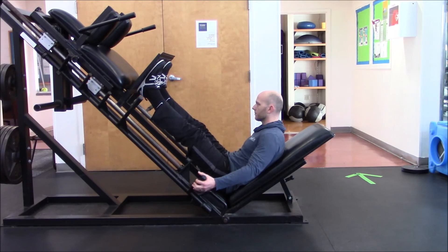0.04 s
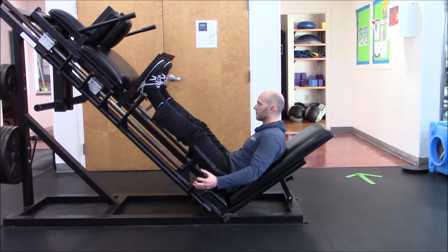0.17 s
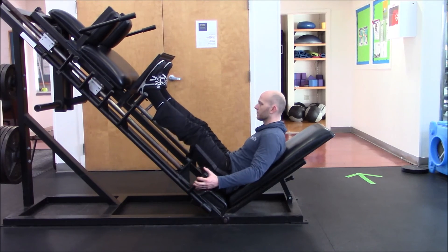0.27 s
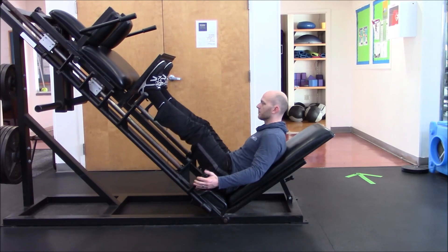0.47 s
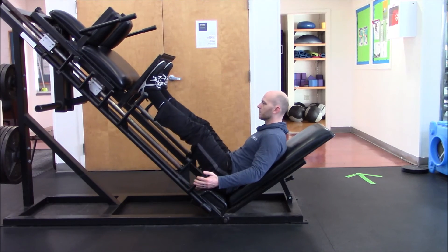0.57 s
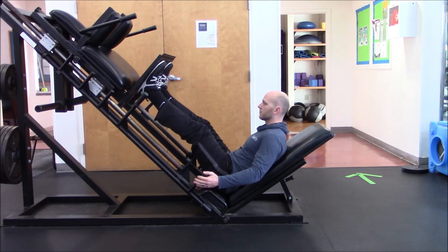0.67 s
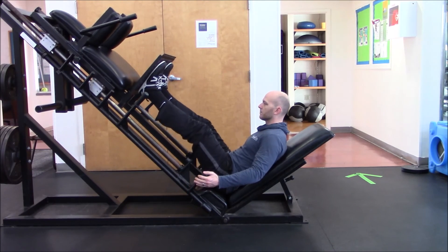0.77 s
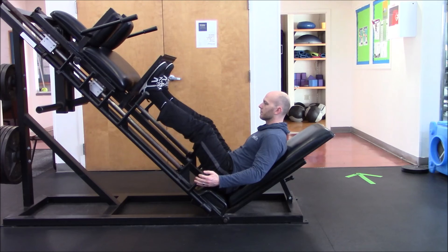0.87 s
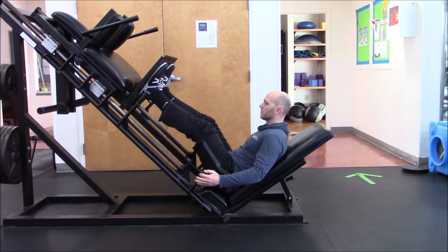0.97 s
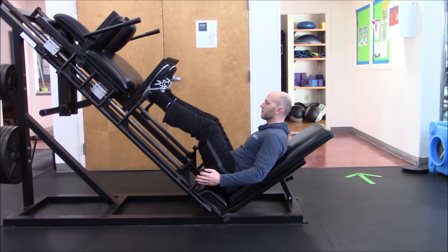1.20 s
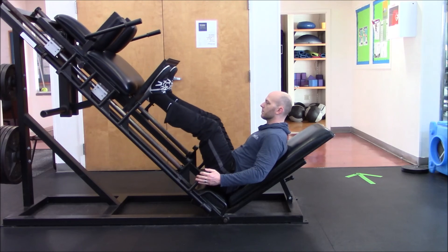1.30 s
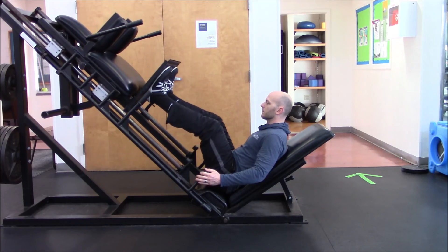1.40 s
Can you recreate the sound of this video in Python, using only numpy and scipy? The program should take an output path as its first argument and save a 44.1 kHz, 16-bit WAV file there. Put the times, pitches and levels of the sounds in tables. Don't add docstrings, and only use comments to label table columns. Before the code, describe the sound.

Metal clanks from a leg press in a hard-walled gym. Low ventilation hum runs throughout. At about 0.24 s a steel lever hits its stop and bounces at 0.3; at 0.5 a second, much harder clank crashes and rings, bouncing near 0.66. From about 0.85 the sled rolls with faint hiss, rumble and ticks, with soft knocks near 0.93, 1.27 and 1.35. Bright room tail, near-mono.

```python
import sys
import numpy as np
from scipy import signal
from scipy.io import wavfile

SR = 44100
rng = np.random.default_rng(int(sys.argv[2]) if len(sys.argv) > 2 else 0)


def generate_wav(sig):
    pcm = np.round(np.clip(np.atleast_2d(sig).T, -1, 1) * 32767).astype(np.int16)
    wavfile.write(sys.argv[1], SR, pcm)


def field_ratio(decibels):
    return 10 ** (np.asarray(decibels, dtype=float) / 20)


N = 63945
T = np.arange(N) / SR
EDGES = 31 * 2 ** np.arange(0, 9.1, 1 / 3)

# start in seconds, level in dB, tilt in dB per octave, clatter T60 in seconds.
FIRST_LEVER_HITS = [
    (.2400, -17.5, 4.5, 0.039),
    (.2445, -20, -2, 0.19),
    (.3005, -27.5, 2.5, 0.081),
]
SECOND_LEVER_HITS = [
    (.5030, -11.5, 0, 0.042),
    (.5075, -13.5, 0.45, 0.055),
    (.523, -19.5, -2.76, 0.29),
    (.6545, -31, 0.5, 0.073),
    (.6585, -22, -1.5, 0.094),
    (.70, -44, -3.5, 0.54),
]
FRAME_HITS = [
    (.9325, -33, 1.8, 0.41),
    (0.938, -38.5, 0, 0.14),
    (1.2105, -43, -5.5, 0.33),
    (1.2668, -35.5, 2, 0.1),
    (1.2765, -35, 0.5, 0.12),
    (1.345, -58.5, -11.5, 0.094),
]

# frequency in Hz, level in dB, T60 in seconds.
FIRST_LEVER_RING = [(807, -12, .4), (1200, -10, .66), (1790, -6, .3), (1900, 2, .3), (1933, -8, .58),
                    (2196, -2, .46), (2277, -6, .43), (2832, -11, .44), (3456, -16, .47), (4113, -22, .55),
                    (4689, -21, .34), (4786, -17, .55), (6175, -30, .46), (8538, -28, .25)]
SECOND_LEVER_RING = [(301, -12, 1), (802, -12, .6), (987, -5, .4), (1385, -12, .4), (1707, -10, .5),
                     (1812, -10, .35), (1915, -2, .4), (2060, -10, .3), (2200, -11, .5), (2845, -11, .5),
                     (3135, -11, .6), (3196, -11, .6)]
FRAME_RING = [(802, -8, .66), (1324, -10, .5), (1696, -1, .3), (1840, -10, .6), (2191, -8, .5),
              (2342, -11, .5), (2805, -11, .5), (4797, -15, .9)]

# frequency in Hz, level in dB, T60 in seconds.
FIRST_LEVER_BITE = [(650, -8, .15), (780, -8, .3), (1096, -4, .08), (1200, -13, .5), (1790, -1, .2),
                    (1905, 0, .2), (2195, -1, .25), (2844, 2, .07), (3450, -8, .07), (4740, -8, .093),
                    (6350, -9, .04), (7700, -18, .03), (8560, -20, .15), (10500, -22, .05)]
SECOND_LEVER_BITE = [(1400, -9, .08), (1860, -6, .3), (2080, -3, .08), (2800, -2, .08), (2930, 3, .09),
                     (3150, -10, .3), (3600, -11, .06), (4100, -12, .06), (5000, -15, .06),
                     (6200, -18, .06), (7400, -20, .06), (8600, -22, .05)]
FRAME_BITE = [(616, -5, .067), (800, -12, .2)]
FIRST_KNOCK_BITE = [(307, 3, .7), (953, -1, .6), (1250, -2, .05), (1600, 1, .07), (1750, -2, .1),
                    (2300, 0, .1), (2800, 4, .1), (3300, -5, .05), (3800, -9, .05)]
SECOND_KNOCK_BITE = [(340, -6, .4), (1000, -4, .08), (1450, -1, .07), (1700, 0, .07), (2120, 2, .15),
                     (2700, -1, .08), (3200, -5, .05), (3650, -8, .05)]

# frequency in Hz, level in dB, T60 in seconds.
PIN_RING = [(4796, -21.5, .8)]
HANDLE_RING = [(520, -4, .5)]
RAIL_RING = [(3467, -13, 1.1), (166.7, -2, 1.1), (2130, -7.5, 0.31)]

# frequency in Hz, level in dB per Hz.
FIRST_LEVER_CLATTER = [(88, -82), (150, -20), (772, -13), (954, -14), (1110, -12.5), (2140, -4), (2600, -6),
                       (4720, -21.5), (15000, -80)]
SECOND_LEVER_CLATTER = [(59, -47), (100, -38.5), (275, -16), (916, -4.5), (1370, -2), (1580, -16),
                        (1840, -2), (7710, -28), (15500, -97)]
FRAME_CLATTER = [(120, -22.5), (200, -9), (470, -3), (542, 2), (891, 0), (971, 7.5), (1180, -3.5),
                 (1720, 1.5), (6000, -30), (7800, -57), (13200, -120)]

# frequency in Hz, width in Hz, level in dB.
FIRST_LEVER_PLATE = [(790, 70, -3), (1120, 120, 1), (1800, 160, 0), (2220, 150, 0)]
SECOND_LEVER_PLATE = [(306, 117, -4), (1423, 91, -11), (1937, 460, 0.5), (2760, 820, -1.5)]
FRAME_PLATE = [(533, 31, -12), (1000, 42, -6.5), (1723, 33, -1), (2470, 810, -7)]

# frequency in Hz, width in Hz.
FIRST_LEVER_DIPS = [(1400, 300), (2560, 770)]
SECOND_LEVER_DIPS = [(1600, 200), (2500, 300), (4500, 400)]

# start in seconds, level in dB, T60 in seconds.
CRASH_HITS = [
    (.5035, -36, .05),
    (0.5065, -29.5, 0.24),
]
# frequency in Hz, level in dB per Hz.
CRASH_COLOUR = [(3500, 6), (5000, 3), (8000, -11), (11000, -15.5), (15500, -34)]

# time in seconds, peak level in dB.
ROLLER_TICKS = [(0.1844, -51), (0.8294, -53), (0.8445, -56), (0.8844, -52), (0.9208, -43.5), (0.9744, -49),
                (1.0126, -48), (1.0556, -44), (1.079, -48.5), (1.1732, -45), (1.2136, -49.5), (1.2744, -59),
                (1.2989, -50), (1.3427, -41), (1.4044, -46), (1.4244, -47)]
# time in seconds, level in dB.
ROLL_LEVEL = [(0, -76), (.75, -78), (.86, -60.5), (1.1, -57), (1.25, -56), (1.45, -56)]
# frequency in Hz, level in dB per Hz.
TICK_COLOUR = [(3000, 6.5), (6500, -6), (9000, -0.5), (12000, -8), (15500, -31)]
HISS_COLOUR = [(1760, -27), (3000, -0.5), (5410, -14), (5840, -4), (8110, -10), (11800, -24.5),
               (15500, -42)]
RUMBLE_COLOUR = [(47, -43), (80, -25), (168, 16), (236, -15), (331, 24.5), (513, 11), (720, -8),
                 (1870, 8.5), (3800, -4), (4940, -63), (8360, -120)]

# frequency in Hz, level in dB per Hz.
AIR_COLOUR = [(15, -52), (25, -15), (64, -24), (77, -7), (99, -12), (152, -4.5), (421, -8), (1200, -22.5),
              (15500, -43.5)]
# frequency in Hz, T60 in seconds.
ROOM_DECAY = [(100, 0.65), (300, 1.72), (1000, 0.77), (3000, 0.82), (6000, 0.66), (12000, 0.051)]
# frequency in Hz, side level in dB.
ROOM_WIDTH = [(60, -33), (250, -50), (700, -26.5), (2400, -19), (4400, -16), (7000, -16), (15000, -48)]

RISE_S = 0.00079
BITE_SEND_DB = -11.5
ROOM_DB = -1


def steel(hits, clatter, plate, ring, bite, ring_db, plate_db, low_rise_s=0.0023, dips=()):
    def shape(hz):
        slow = np.clip(600 / hz, 1, 6)
        rise = RISE_S + low_rise_s * (slow - 1) / 5
        level = 0
        for s, db, tilt, t60 in hits:
            level = level + field_ratio(db + tilt * np.log2(hz / 2000)) * burst(s, rise, t60 * slow ** 0.68)
        return colour(clatter, hz) * level

    noise = bank(shape)
    for hz, width in dips:
        noise = noise - 0.56 * peak(noise, hz, width)
    noise = noise + sum(field_ratio(plate_db + db) * peak(noise, hz, max(width, 40)) for hz, width, db in plate)
    body = noise + field_ratio(ring_db) * strike(hits, ring)
    return np.array([body, field_ratio(-6) * strike(hits, bite)])


def strike(hits, modes):
    luck_db = rng.normal(0, 2, (len(hits), len(modes)))
    longest_t60_s, contact_hz = 0.72, 6500
    rings = 0
    for k, (hz, level_db, t60) in enumerate(modes):
        clicks = np.full(N, 1e-18)
        for (s, db, tilt, _), chance in zip(hits, luck_db[:, k]):
            clicks[int(s * SR)] = (-1) ** k * field_ratio(db + level_db + tilt * np.log2(hz / 2000) + chance)
        r = field_ratio(-60 / (min(t60, longest_t60_s) * SR))
        w = 2 * np.pi * hz / SR
        rings = rings + signal.lfilter([0, np.sin(w)], [1, -2 * r * np.cos(w), r * r], clicks)
    return signal.sosfilt(signal.butter(2, contact_hz, fs=SR, output="sos"), rings)


def loose_parts():
    pin = strike(SECOND_LEVER_HITS[3:5] + FRAME_HITS[:1], PIN_RING)
    handle = strike(FIRST_LEVER_HITS[2:], HANDLE_RING)
    rail = strike(FRAME_HITS[3:5], RAIL_RING)
    first_knock = field_ratio(-3) * strike(FRAME_HITS[:2], FIRST_KNOCK_BITE)
    second_knock = field_ratio(-3) * strike(FRAME_HITS[3:5], SECOND_KNOCK_BITE)
    return pin + handle + rail + first_knock + second_knock


def crash():
    spray = sum(field_ratio(db) * burst(s, RISE_S, t60) for s, db, t60 in CRASH_HITS)
    return bank(lambda hz: colour(CRASH_COLOUR, hz) * spray)


def thump():
    floor = rms_one(peak(rng.standard_normal(N), 99, 53))
    return field_ratio(-38) * floor * burst(0.507, 0.023, 0.54)


def sled():
    speed_db = np.interp(T, *np.transpose(ROLL_LEVEL))
    full_db = ROLL_LEVEL[-1][1]
    tick_db, tick_t60_s = -8.5, 0.082
    ticks = sum(field_ratio(db + tick_db) * burst(s - .002, 0.00064, tick_t60_s) for s, db in ROLLER_TICKS)

    def hiss_and_ticks(hz):
        hiss = colour(HISS_COLOUR, hz) * field_ratio(speed_db + 1.7 * drift(24))
        return hiss + colour(TICK_COLOUR, hz) * ticks

    rumble_db, rumble_swing = 10.5, 22
    rumble_level = field_ratio(full_db + rumble_db + rumble_swing * (speed_db - full_db))
    return bank(hiss_and_ticks) + bank(lambda hz: colour(RUMBLE_COLOUR, hz) * rumble_level)


def air():
    hum_hz, hum_width_hz = 97.6, 21
    hum = peak(rng.standard_normal(N + SR), hum_hz, hum_width_hz)
    hum = rms_one(peak(hum, hum_hz, hum_width_hz)[SR:])
    roar = bank(lambda hz: colour(AIR_COLOUR, hz))
    return field_ratio(-52.5) * roar + field_ratio(-58) * hum


def gym(x, gain):
    def shape(hz):
        t60 = at_hz(ROOM_DECAY, hz)
        return gain(hz) * burst(0, 0.0051, t60) / np.sqrt(SR * t60 / np.log(1e6))

    return signal.fftconvolve(x, bank(shape))[:N]


def rms_one(x):
    return x / np.sqrt(np.mean(x ** 2) + 1e-20)


def at_hz(points, hz):
    table = np.array(points)
    return np.interp(np.log(hz), np.log(table[:, 0]), table[:, 1])


def drift(rate):
    r = np.exp(-2 * np.pi * rate / SR)
    return rms_one(signal.lfilter([1], [1, -2 * r, r * r], rng.standard_normal(N + SR))[SR:])


def bank(shape):
    out, white = 0, rng.standard_normal((2, N))
    for k, (low, high) in enumerate(zip(EDGES, EDGES[1:])):
        sos = signal.butter(2, [low, high], "band", fs=SR, output="sos")
        out = out + signal.sosfilt(sos, white[k % 2] * shape(np.sqrt(low * high)) + 1e-18)
    return out


def colour(spectrum, hz):
    def gain(f):
        beyond = np.abs(np.log2(f / np.clip(f, spectrum[0][0], spectrum[-1][0])))
        return field_ratio(at_hz(spectrum, f) - 24 * beyond)

    grid = np.linspace(EDGES[0], EDGES[-1], num=2000)
    return gain(hz) / np.sqrt(np.mean(gain(grid) ** 2) * EDGES[-1] * 2 / SR)


def burst(s, rise, t60):
    age = np.maximum(T - s, 0)
    return (1 - np.exp(-age / rise)) * field_ratio(-60 * age / t60)


def peak(x, hz, width):
    r = np.exp(-np.pi * width / SR)
    top = np.array([1, 0, -1]) * (1 - r * r) / 2
    return signal.lfilter(top, [1, -2 * r * np.cos(2 * np.pi * hz / SR), r * r], x)


def scene():
    first = steel(FIRST_LEVER_HITS, FIRST_LEVER_CLATTER, FIRST_LEVER_PLATE, FIRST_LEVER_RING,
                  FIRST_LEVER_BITE, ring_db=-15.5, plate_db=5.5, dips=FIRST_LEVER_DIPS)
    second = steel(SECOND_LEVER_HITS, SECOND_LEVER_CLATTER, SECOND_LEVER_PLATE, SECOND_LEVER_RING,
                   SECOND_LEVER_BITE, ring_db=-19, plate_db=4.5, dips=SECOND_LEVER_DIPS)
    frame = steel(FRAME_HITS, FRAME_CLATTER, FRAME_PLATE, FRAME_RING,
                  FRAME_BITE, ring_db=-13, plate_db=4.5, low_rise_s=0.0034)
    body, bite = first + second + frame
    bite = bite + loose_parts()
    body = body + crash()
    direct = body + bite
    to_room = body + field_ratio(BITE_SEND_DB) * bite
    rolling, ventilation = sled(), air()

    mid = direct + thump() + field_ratio(ROOM_DB) * gym(to_room, lambda hz: 1) + rolling + ventilation

    side = field_ratio(-0.5) * gym(to_room, lambda hz: field_ratio(at_hz(ROOM_WIDTH, hz)))
    side = side + field_ratio(-21) * peak(peak(direct, 2400, 4000), 2400, 4000)
    side = side + field_ratio(-6.5) * peak(ventilation[::-1], 900, 6000)
    late_sled = np.pad(peak(rolling, 2000, 3000), (700, 0))[:N]
    side = side + field_ratio(-19.5) * late_sled

    lean_db = np.array([[.03], [-.03]])
    return mid * field_ratio(lean_db) + side * [[1], [-1]]


def band_limit(x):
    return signal.sosfilt(signal.butter(12, 15610, fs=SR, output="sos"), x)


def record(dry):
    ceiling = .93
    rounded = dry / (1 + (dry / ceiling) ** 6) ** (1 / 6)
    low_cut = signal.butter(2, 81, "high", fs=SR, output="sos")
    top_cut = signal.cheby2(16, 50, 15750, fs=SR, output="sos")
    mix = signal.sosfilt(np.vstack([low_cut, top_cut]), rounded)
    return band_limit(mix)


dry = scene()
out = record(dry)
generate_wav(out)
```